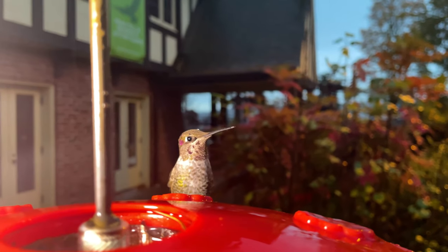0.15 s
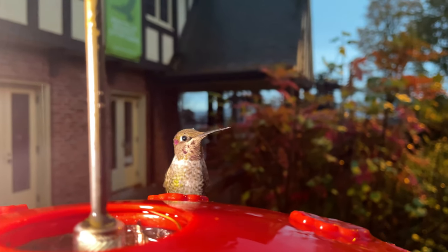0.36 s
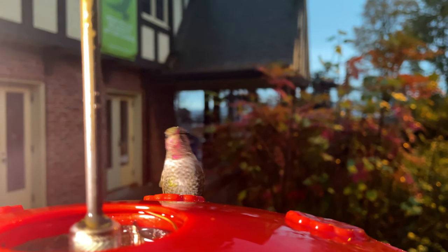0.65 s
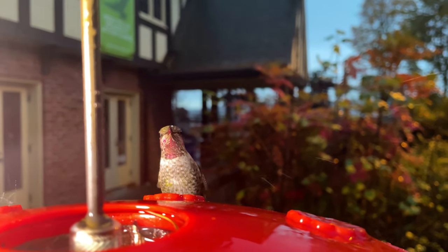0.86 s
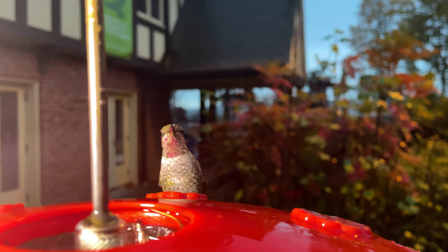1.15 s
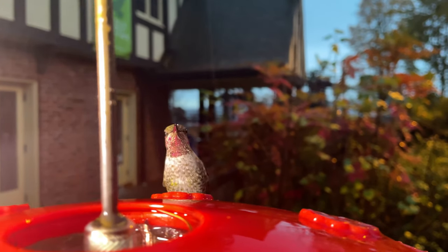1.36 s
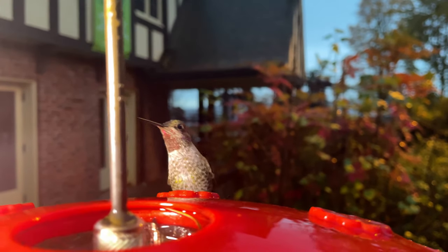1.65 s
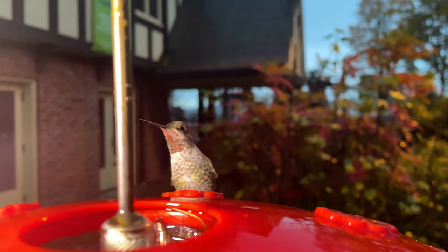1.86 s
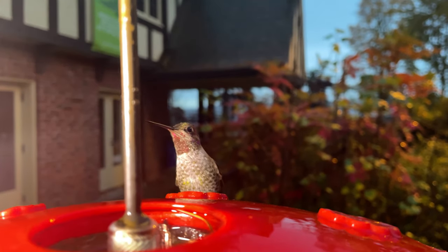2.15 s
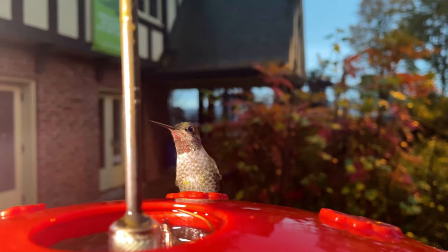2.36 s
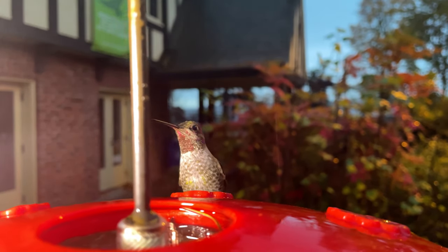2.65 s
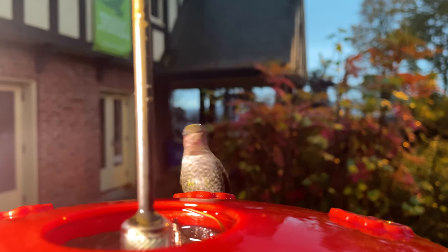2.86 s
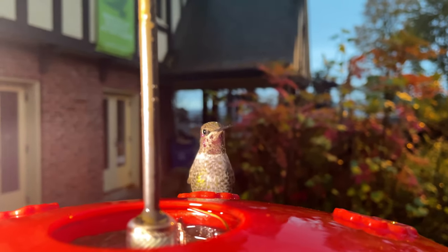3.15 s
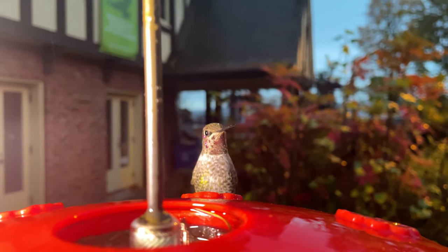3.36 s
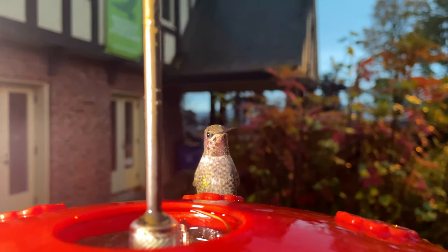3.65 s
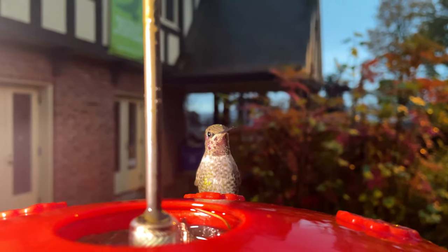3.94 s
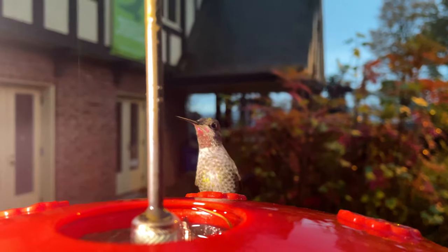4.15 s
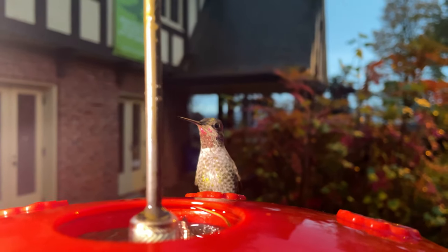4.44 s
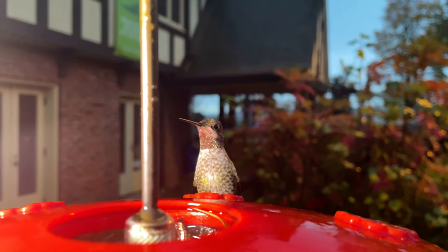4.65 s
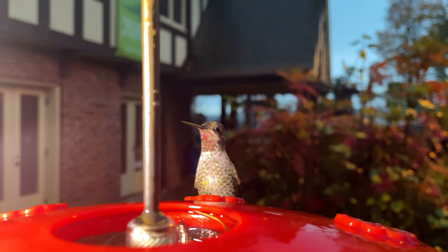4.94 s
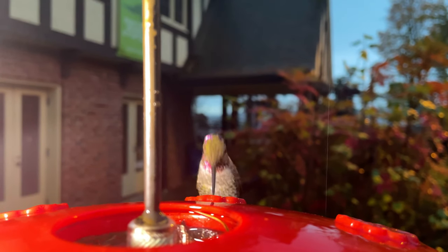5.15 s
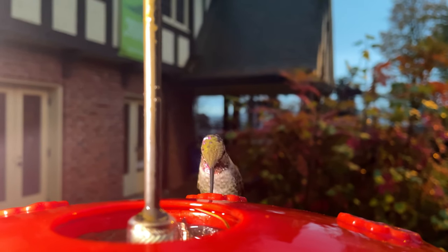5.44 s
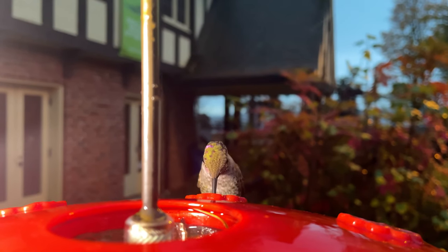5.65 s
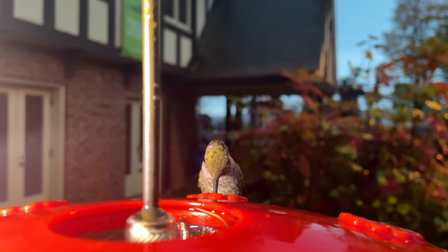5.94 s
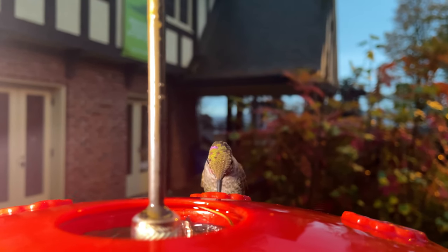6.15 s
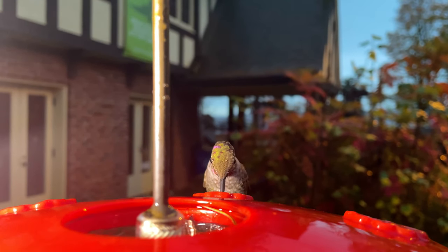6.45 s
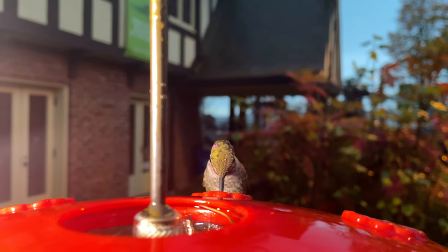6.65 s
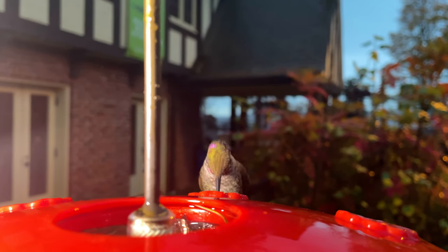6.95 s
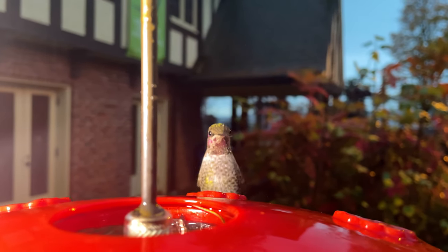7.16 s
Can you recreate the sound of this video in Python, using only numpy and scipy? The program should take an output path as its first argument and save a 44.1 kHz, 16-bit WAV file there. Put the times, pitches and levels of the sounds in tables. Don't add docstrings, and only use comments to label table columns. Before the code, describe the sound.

Outdoors, close microphone beside a plastic feeder. A hummingbird squeezes five fast, scratchy warbled trills into just over a second, each a high chattering burst ending in a quick flourish. Afterwards come only two single chips, around three and five seconds. Light raindrops tick and pop irregularly on the thin hollow shell. Behind lie a soft patter, dull traffic roar, low wind rumble and a far engine that swells toward the end.

```python
import sys
import numpy as np
from scipy import signal
from scipy.fft import rfft, irfft, next_fast_len
from scipy.io import wavfile
from scipy.ndimage import uniform_filter1d

SR = 44100
rng = np.random.default_rng(int(sys.argv[2]) if len(sys.argv) > 2 else 0)


def bounce(signal):
    frames = np.transpose(np.atleast_2d(signal))
    limited = np.clip(frames, -1, 1)
    pcm = np.round(limited * 32767).astype(np.int16)
    wavfile.write(sys.argv[1], SR, pcm)


def volts_from_decibels(level):
    exponent = np.asarray(level, float) / 20
    return 10 ** exponent


N = 322371

# time in seconds, pitch in Hz, effort in dB.
WARBLES = [
    [(0.2595, 4780, -20), (0.27, 5010, -17.5), (0.277, 3290, -9.5), (0.285, 4980, -14),
     (0.294, 2270, -11.5), (0.3015, 4980, -17), (0.3065, 3060, -8.5), (0.313, 4620, -12),
     (0.316, 2490, -15)],
    [(0.5105, 4940, -14), (0.517, 4810, -17.5), (0.523, 3870, -10.5), (0.528, 4255, -7), (0.533, 3585, -14),
     (0.537, 4064, -6.5), (0.5425, 2770, -15), (0.5455, 3890, -17.5), (0.5485, 2510, -5)],
    [(0.736, 4850, -16), (0.746, 4706, -10.5), (0.75, 3273, -12.5), (0.754, 3290, -3), (0.758, 2124, -13),
     (0.762, 2800, -5.5), (0.769, 2890, -4), (0.775, 2310, -10), (0.787, 1720, -19)],
    [(1.0075, 4644, -16), (1.017, 4700, -13), (1.027, 2114, -10), (1.0345, 4690, -16), (1.042, 1976, -12),
     (1.047, 2800, -8.5), (1.051, 2930, -9), (1.059, 1440, -18.5)],
]


def rms_one(x):
    return x / np.sqrt(np.mean(x ** 2) + 1e-20)


def drift(rate_hz):
    lowpass = signal.butter(2, rate_hz, fs=SR, output="sos")
    return rms_one(signal.sosfilt(lowpass, rng.standard_normal(N + SR))[SR:])


def coloured(x, spectrum):
    hz, db = np.transpose(spectrum)
    size = next_fast_len(N)
    log_hz = np.log(np.fft.rfftfreq(size, 1 / SR) + 1)
    gain = volts_from_decibels(np.interp(log_hz, np.log(hz), db, left=-80, right=-80))
    return rms_one(irfft(rfft(x, size) * gain, size)[:N])


def add(out, s, x):
    i = round(s * SR)
    out[i:i + len(x)] += x[:N - i]


def wind(gust_db):
    # frequency in Hz, level in dB per Hz.
    wind_spectrum = [(8.8, -40.5), (15, -6), (43, 4.5), (134, -10), (200, -22.5), (260, -68), (440, -120)]
    return volts_from_decibels(gust_db) * coloured(rng.standard_normal(N), wind_spectrum)


def traffic(swing_db):
    # frequency in Hz, level in dB per Hz.
    traffic_spectrum = [(76, -26), (130, -4.5), (268, -3), (800, -8.5), (1040, -44.5), (1760, -120)]
    level_db = -50 + 0.3 * swing_db + 2.0 * drift(7.2)
    return volts_from_decibels(level_db) * coloured(rng.standard_normal(N), traffic_spectrum)


def engine():
    # frequency in Hz, level in dB per Hz.
    engine_spectrum = [(170, -17), (205, -1), (240, -7), (275, 0.5), (320, -27)]
    # peak in seconds, level in dB, fade either side in dB per second.
    swells = [
        (0.12, -53.5, 85),
        (0.67, -58.5, 71),
        (1.44, -52.5, 54),
        (3.05, -55, 39),
        (4.05, -72, 34),
        (5.27, -49.5, 173),
        (5.54, -46.5, 87),
        (6.3, -51, 17),
        (7.08, -46.5, 8),
    ]
    idle_db = -71
    t = np.arange(N) / SR
    level_db = np.max([np.maximum(db - fade * np.abs(t - s), idle_db) for s, db, fade in swells], axis=0)
    return volts_from_decibels(level_db) * coloured(rng.standard_normal(N), engine_spectrum)


def patter(swing_db):
    # frequency in Hz, level in dB per Hz.
    patter_spectrum = [(350, -4), (950, 2.5), (2000, -3.5), (3800, -9), (6300, -13.5), (7600, -20.5),
                       (8200, -6), (9000, -23.5)]
    drops_per_s, decay_s = 40.0, 0.0018
    out = rng.standard_normal(N)
    for low_hz, high_hz in [(390, 1750), (1100, 7500), (2800, 5500), (504, 9000)]:
        size_db = 4.18 * np.minimum(rng.exponential(1, N), 2.9)
        born = (rng.random(N) < drops_per_s / SR) * volts_from_decibels(size_db)
        bursts = signal.lfilter([1], [1, -np.exp(-1 / (decay_s * SR))], born + 1e-18)
        band = signal.butter(2, [low_hz, high_hz], "band", fs=SR, output="sos")
        out += volts_from_decibels(1.0) * signal.sosfilt(band, bursts * rng.standard_normal(N))
    return volts_from_decibels(-44.5 + 0.16 * swing_db) * coloured(out, patter_spectrum)


def syrinx(rows, flutter):
    # multiple of the pitch, level in dB.
    overtones = [(2, -15), (3, -16), (4, -29)]
    # frequency in Hz, gain in dB.
    throat = [(1500, -1.5), (3500, 7), (4600, 3.5), (5600, 5), (6800, -1.5), (7800, 4), (9000, 17.5),
              (11000, -42)]
    # start in seconds, end in seconds, Hz above the first, dB against it.
    second_membrane = [(0.287, 0.307, 800, -7.5), (0.382, 0.4, 900, -1.5), (0.522, 0.547, 1150, -17),
                       (0.54, 0.552, 1200, -3), (0.608, 0.621, 1000, -6.5), (0.7557, 0.762, 1000, 2.5),
                       (0.775, 0.783, 880, 4.5), (1.023, 1.033, 900, 1), (1.0365, 1.045, 950, 5.5),
                       (1.142, 1.162, 1000, -18), (3.12, 3.12, 1100, -14)]
    jitter_rad, jitter_rad_per_octave = .2, .25
    rasp_db, rasp_db_per_octave = -22.5, 9
    s, hz, db = np.transpose(rows)
    t = np.arange(s[0], s[-1], 1 / SR)
    pitch = uniform_filter1d(np.interp(t, s, hz), size=33, mode="nearest")
    octaves_down = np.log2(3000 / pitch)
    grain, wobble = flutter[:, round(s[0] * SR):][:, :len(t)]
    phase = 2 * np.pi * np.cumsum(pitch) / SR
    phase = phase + np.maximum(jitter_rad + jitter_rad_per_octave * octaves_down, 0) * wobble

    tone = np.exp(1j * phase)
    open_beak_db = 3.5 * (s[0] > 2)
    for multiple, level_db in overtones:
        colour_db = np.interp(multiple * pitch, *np.transpose(throat), right=-60) + open_beak_db
        tone = tone + volts_from_decibels(level_db + colour_db) * np.exp(1j * multiple * phase)

    sides = np.ones(len(t), complex)
    for start, end, above_hz, second_db in second_membrane:
        beat = np.exp(2j * np.pi * above_hz * t + 0.61j * wobble)
        swell = np.clip(np.minimum(t - start, end - t) / 0.0014, 0, 1)
        sides += swell * volts_from_decibels(second_db) * (beat + volts_from_decibels(-40) / beat + volts_from_decibels(-12.5) * beat * beat)

    rasp = volts_from_decibels(rasp_db + rasp_db_per_octave * octaves_down) * grain
    fade = np.minimum(1, np.minimum(t - s[0], s[-1] - t) / 0.0019)
    return volts_from_decibels(np.interp(t, s, db)) * fade * (tone * sides).imag * (1 + rasp)


def trill(first, last, first_db, last_db, hz):
    # ms from the peak, share of the peak pitch, level in dB.
    up_stroke = [(-2.4, .46, -24), (-1.15, .66, -13), (-.5, .84, -4), (0, .99, 0), (.65, 1.11, -3),
                 (1.4, 1.18, -9)]
    down_stroke = [(1.9, 1.06), (5.4, 0.52)]   # (ms from the peak, share of the peak pitch)
    stroke_gap_s, speed_up = .0062, .09
    spread = (1.8, .025, 4.0)
    u = np.linspace(0, 1, round((last - first) / stroke_gap_s) + 1)
    chance = rng.standard_normal((len(u), 3)) * spread
    times = first + (last - first) * (u + speed_up * u * (1 - u))
    warm_db = np.pad((-7, -6), (0, len(u) - 2))
    levels = first_db + (last_db - first_db) * u + warm_db + chance[:, 0]
    pitches = hz * (1 + chance[:, 1])
    joined = any(abs(first - rows[-1][0]) < .01 for rows in WARBLES)
    downs = (-8.5 if joined else -19) - warm_db / 2 + chance[:, 2]
    evens = np.where(warm_db < 0, 0.49, 1)
    for s, db, pitch, down_db, even in zip(times, levels, pitches, downs, evens):
        shape = [(ms, share, rel_db * even) for ms, share, rel_db in up_stroke]
        shape += [(ms, share, down_db) for ms, share in down_stroke]
        yield [(s + ms / 1000, pitch * share, db + rel_db) for ms, share, rel_db in shape]


def flourish(turns, effort):
    s, hz = np.transpose(turns)
    return np.transpose([s, hz, np.interp(s, s[[0, -1]], effort)])


def through_throat(rows, attack_s):
    # pitch in Hz, gain in dB.
    reach = [(1200, -9), (2100, -11.5), (2900, -5.5), (3400, -1), (4000, -3.5), (5000, -1.5)]
    s, hz, db = np.transpose(rows)
    t = np.arange(s[0], s[-1], .0005)
    pitch = np.interp(t, s, hz)
    rise_db = -20 * np.clip(1 - (t - s[0]) / attack_s, 0, 1) ** 2
    level_db = np.interp(t, s, db) + np.interp(pitch, *np.transpose(reach)) + rise_db
    return np.transpose([t, pitch, level_db])


def chip(end, lead_ms, db):
    # ms before the end, pitch in Hz, level in dB.
    chip_fall = [(20, 4560, -7), (16.5, 4050, -4), (13, 3480, 0), (8, 2000, 0), (5, 1330, -6),
                 (2.5, 1000, -11), (0, 800, -17)]
    lead_hz, lead_db = 4760, -15
    top_ms = chip_fall[0][0]
    lead = [(top_ms + lead_ms, lead_hz, lead_db - 12), (top_ms + lead_ms / 2, lead_hz, lead_db)]
    return [(end - ms / 1000, hz, db + rel_db) for ms, hz, rel_db in lead + chip_fall]


def hummingbird():
    # first stroke in seconds, last stroke in seconds, first level in dB, last level in dB, pitch in Hz.
    trills = [
        (0.0727, 0.1102, -19, -12, 3430),
        (0.3172, 0.3752, -12, -14, 3720),
        (0.5505, 0.6016, -9, -12, 3890),
        (0.808, 0.8502, -15, -10, 3730),
        (1.089, 1.1317, -15.5, -14.5, 3650),
    ]
    # time in seconds, pitch in Hz.
    flourishes = [
        [(0.1152, 1810), (0.12, 4300), (0.1245, 1620), (0.129, 3300)],
        [(0.3795, 2310), (0.3815, 3900), (0.384, 3090), (0.3862, 1670), (0.392, 3680)],
        [(0.605, 2800), (0.608, 3900), (0.6115, 2410), (0.614, 3650), (0.6175, 1770), (0.621, 3600),
         (0.627, 1280)],
        [(0.8535, 1740), (0.858, 3866), (0.8627, 1670), (0.867, 3280)],
        [(1.136, 2150), (1.1395, 4140), (1.143, 1685), (1.146, 3520), (1.152, 1160)],
    ]
    # effort at the start in dB, effort at the end in dB.
    flourish_effort = [(-13, -15.5), (-4.5, -21), (-12.5, -9.5), (-4, -12), (-11.5, -9)]
    # end in seconds, soft lead-in in ms, level in dB.
    chips = [
        (3.113, 8.0, -19),
        (5.12, 2.5, -20),
    ]
    # delay in ms, level in dB.
    echo_paths = [(1.6, -18), (4.3, -27), (9.0, -31), (17.0, -33), (31.0, -35)]
    flutter = np.array([drift(1020), drift(450)])
    notes = [stroke for row in trills for stroke in trill(*row)]
    notes += [through_throat(flourish(*pair), .001) for pair in zip(flourishes, flourish_effort)]
    notes += [through_throat(rows, 0.0028) for rows in WARBLES]
    notes += [chip(*row) for row in chips]
    out = np.zeros(N)
    for rows in notes:
        add(out, rows[0][0], syrinx(rows, flutter))
    echoes = np.zeros(N)
    for ms, db in echo_paths:
        add(echoes, ms / 1000, volts_from_decibels(db) * out)
    t = np.arange(round(.09 * SR)) / SR
    scatter = rng.standard_normal(len(t)) * volts_from_decibels(-53.0 - 236 * t)
    return out + echoes + signal.fftconvolve(out, scatter)[:N]


def drop(t, hz, t60, crack_db):
    bright = signal.butter(1, [1900, 6000], "band", fs=SR, output="sos")
    around = signal.butter(2, [hz / 2.67, hz * 1.91], "band", fs=SR, output="sos")
    noise = rng.standard_normal((2, len(t)))
    t60 = max(t60, .004)
    ring = volts_from_decibels(-1.5 - 60 * t / t60) * np.sin(2 * np.pi * hz * t)
    crack = volts_from_decibels(crack_db + 2.0 - 60 * t / (0.41 * t60 + 0.0035)) * signal.sosfilt(bright, noise[0])
    splash = volts_from_decibels(-3.0 - 40 * t / t60) * rms_one(signal.sosfilt(around, noise[1]))
    return ring + crack + splash


def drops():
    # time in seconds, peak in dB, ring in Hz, t60 in seconds.
    slaps = [(0.7237, -22, 1050, 0.0042), (1.0766, -28, 2990, 0.006), (1.3698, -33, 1750, 0.023),
             (1.383, -26.5, 950, 0.035), (1.7312, -23.5, 1940, 0.0085), (2.0077, -26.5, 1140, 0.024),
             (2.3157, -33, 795, 0.024), (3.0015, -33.5, 2250, 0.057), (3.172, -33, 2550, 0.014),
             (4.159, -23, 488, 0.059), (4.262, -34, 5060, 0.029), (4.3016, -27, 900, 0.023),
             (4.458, -30.5, 3100, 0.0062), (4.5022, -33.5, 1740, 0.0091), (4.861, -34.5, 1840, 0.046),
             (4.955, -35, 2770, 0.02), (5.2523, -35, 2490, 0.011), (5.345, -30, 1110, 0.0068),
             (5.5435, -16.5, 1020, 0.016), (5.933, -33, 1510, 0.008), (6.1908, -27, 715, 0.0074),
             (6.718, -33.5, 2370, 0.019), (7.101, -31, 754, 0.011)]
    # time in seconds, peak in dB, ring in Hz,
    # t60 in seconds.
    taps = [(0.674, -27, 1100, 0.032), (0.9952, -31, 2200, 0.0053), (1.243, -23.5, 700, 0.0097),
            (2.0197, -33, 1600, 0.029), (2.402, -31.5, 2370, 0.018), (2.771, -30, 1530, 0.0086),
            (3.1595, -17.5, 2070, 0.0083), (3.3337, -29, 790, 0.013), (3.4008, -29, 1750, 0.023),
            (3.891, -29, 1680, 0.007), (4.0224, -20.5, 2200, 0.0066), (4.1903, -24, 710, 0.011),
            (4.478, -30.5, 1160, 0.032), (4.5277, -22.5, 1470, 0.026), (5.0734, -26.5, 1100, 0.021),
            (5.2308, -29.5, 630, 0.014), (5.4092, -16, 502, 0.01), (5.453, -22, 1080, 0.0059),
            (5.523, -24.5, 1010, 0.016), (5.5962, -35, 2810, 0.0073), (5.6068, -25.5, 870, 0.01),
            (5.8072, -29.5, 2020, 0.023), (5.9907, -29, 754, 0.015), (6.0356, -23.5, 2040, 0.011),
            (6.4093, -32, 1590, 0.012), (6.5076, -20.5, 594, 0.0083), (6.8596, -26.5, 660, 0.0087),
            (7.2817, -25.5, 760, 0.0061)]
    # frequency in Hz, level in dB, t60 in seconds.
    bowl_modes = [(426.7, -0.5, 0.14), (527.6, -2, 0.1), (950, -10, 0.28)]
    # time in seconds, peak in dB.
    bowl_hits = [
        (0.674, -30),
        (3.3337, -42.5),
        (4.159, -31),
        (4.1903, -38),
        (5.0749, -32.5),
        (5.5434, -38),
        (5.5962, -39),
    ]
    slap_crack_db, tap_crack_db, bowl_db = 0, -16, -27
    lead_s = .0008
    out, t = np.zeros(N), np.arange(round(.16 * SR)) / SR
    rise = np.minimum(1, t / 0.00074)
    bowl = sum(volts_from_decibels(db - 60 * t / t60) * np.sin(2 * np.pi * hz * t) for hz, db, t60 in bowl_modes)
    for s, db in bowl_hits:
        add(out, s - lead_s, volts_from_decibels(db) * rise * bowl)
    for rows, crack_db in [(slaps, slap_crack_db), (taps, tap_crack_db)]:
        for s, db, hz, t60 in rows:
            add(out, s - lead_s, volts_from_decibels(db) * rise * (drop(t, hz, t60, crack_db) + volts_from_decibels(bowl_db) * bowl))
    return signal.sosfilt(signal.butter(3, 320, "high", fs=SR, output="sos"), out)


def perch_knocks():
    # time in seconds, peak in dB, frequency in Hz, t60 in seconds.
    knocks = [
        (5.265, -32, 152, .04),
        (5.269, -19, 135, 0.022),
    ]
    out, t = np.zeros(N), np.arange(round(.16 * SR)) / SR
    for s, db, hz, t60 in knocks:
        add(out, s, -volts_from_decibels(db - 60 * t / t60) * np.sin(2 * np.pi * hz * t))
    return out


def scene():
    # time in seconds, level in dB.
    gust = [(0.0, -37.5), (0.35, -41.5), (0.6, -40.5), (0.85, -43.5), (1.36, -43.5), (1.44, -40),
            (1.55, -48.5), (1.63, -33), (1.81, -39), (1.87, -41.5), (2.0, -41), (2.8, -43), (5.07, -42.5),
            (5.6, -42.5), (6.09, -42.5), (6.29, -44), (6.6, -40), (7.31, -41)]
    gust_db = np.interp(np.arange(N) / SR, *np.transpose(gust))
    swing_db = gust_db + 42
    background = wind(gust_db) + traffic(swing_db) + engine() + patter(swing_db)
    return (background + hummingbird() + drops() + perch_knocks())[None]


def starve(x):
    # frequency in Hz, limit in dB against the band's usual level.
    band_limits = [(4000, -11), (5000, -16), (6000, -9), (6800, 2), (7300, -18), (8000, -1)]
    frame, width_hz = 1408, 190
    hz, _, frames = signal.stft(x, SR, nperseg=frame)
    for low_hz in range(4000, 8000, width_hz):
        band = (hz >= low_hz) & (hz < low_hz + width_hz)
        level = np.sqrt(np.mean(np.abs(frames[band]) ** 2, axis=0))
        limit = volts_from_decibels(np.interp(low_hz, *np.transpose(band_limits))) * np.median(level)
        frames[band] *= np.where(level < limit, volts_from_decibels(-31), 1)
    return signal.istft(frames, SR, nperseg=frame)[1][:N]


def roll_off(x):
    return signal.sosfilt(signal.butter(12, 9240, fs=SR, output="sos"), x)


def record(dry):
    lowpass = signal.ellip(8, .5, 55, 7800, fs=SR, output="sos")
    cut = signal.sosfilt(lowpass, starve(dry[0]))
    return roll_off(cut[None])


dry = scene()
out = record(dry)
bounce(out)
```